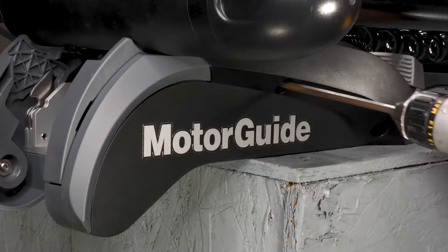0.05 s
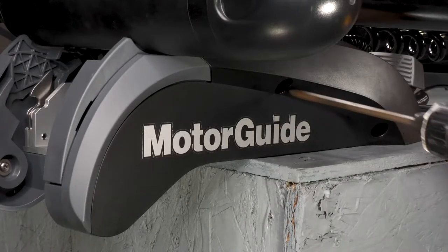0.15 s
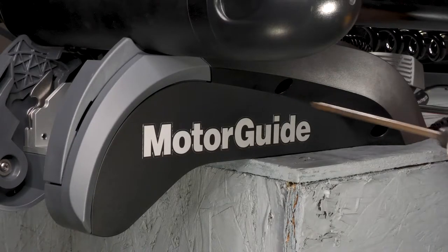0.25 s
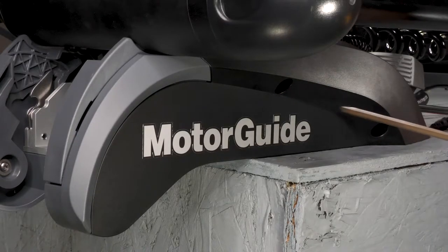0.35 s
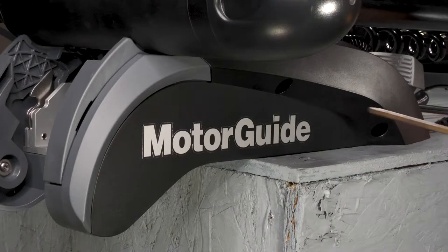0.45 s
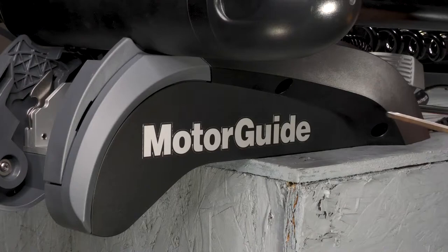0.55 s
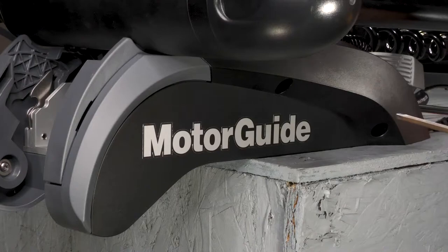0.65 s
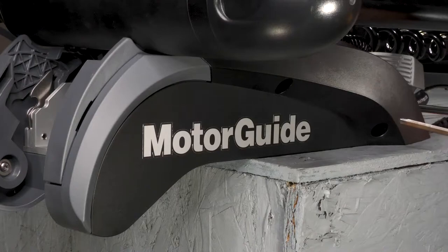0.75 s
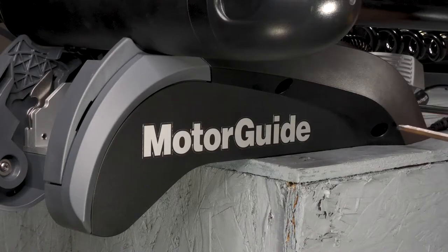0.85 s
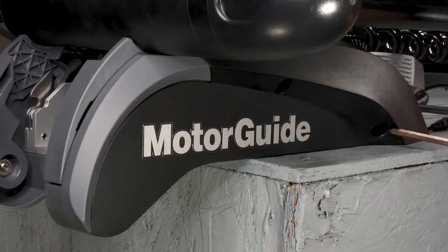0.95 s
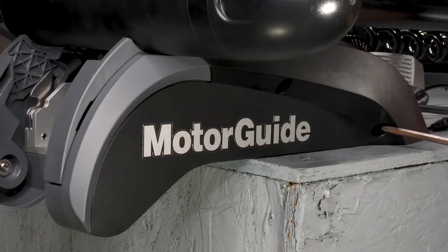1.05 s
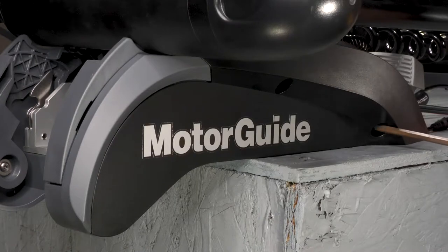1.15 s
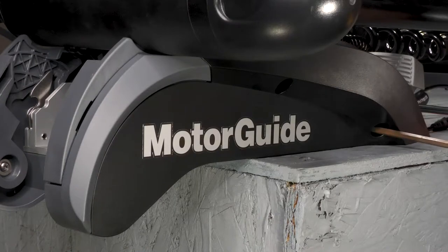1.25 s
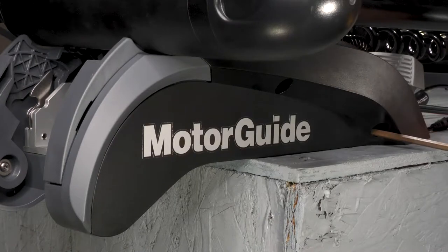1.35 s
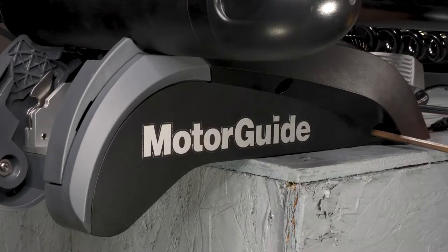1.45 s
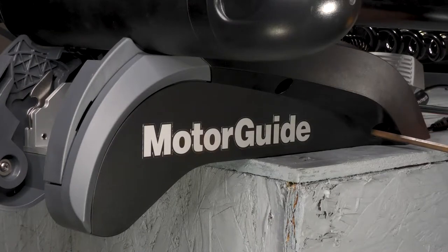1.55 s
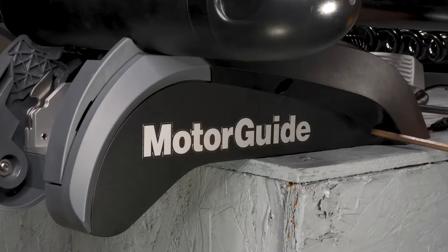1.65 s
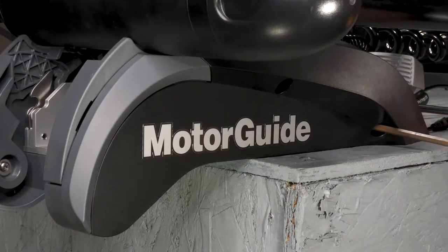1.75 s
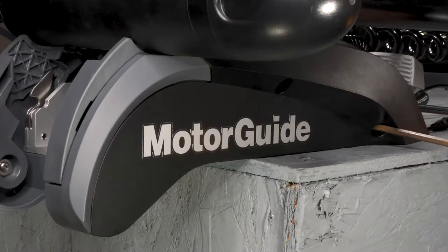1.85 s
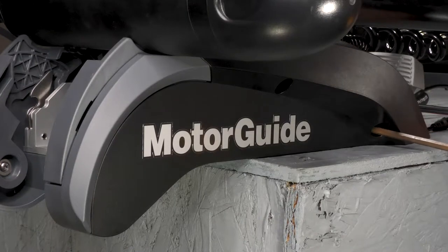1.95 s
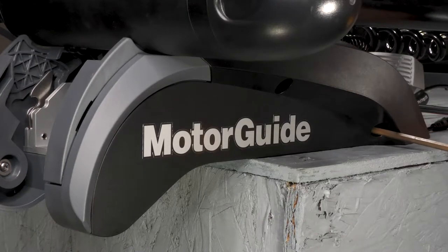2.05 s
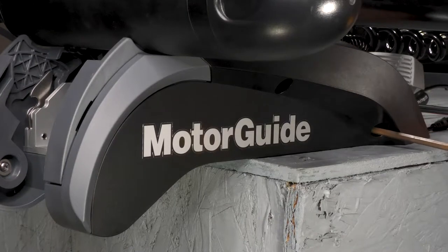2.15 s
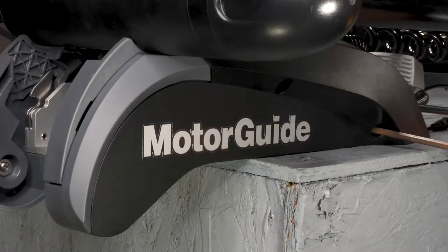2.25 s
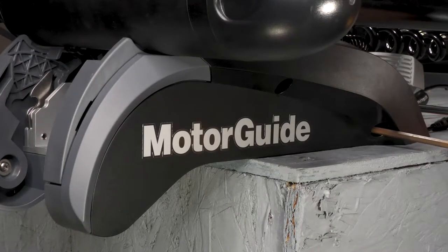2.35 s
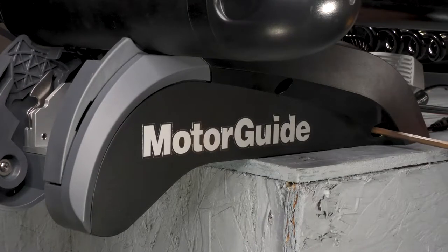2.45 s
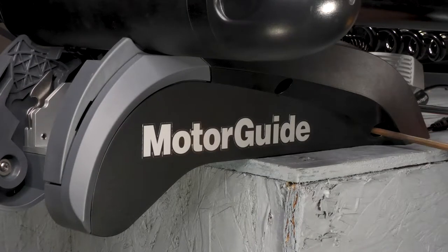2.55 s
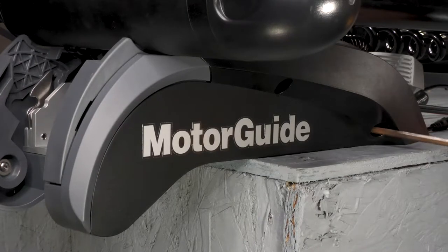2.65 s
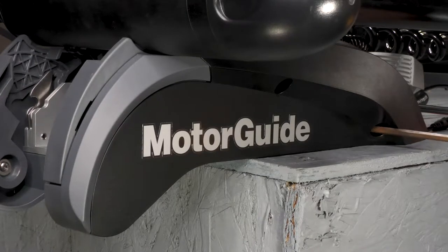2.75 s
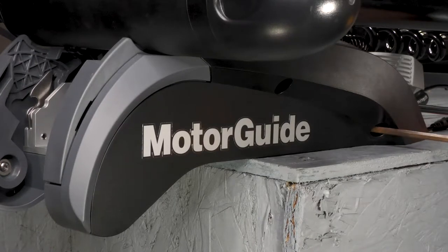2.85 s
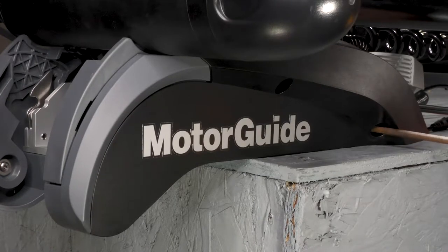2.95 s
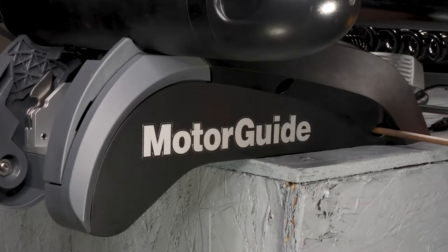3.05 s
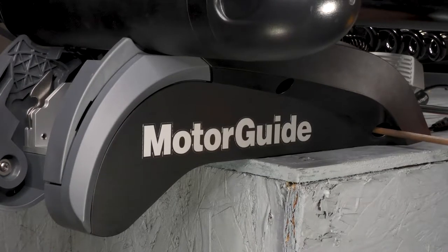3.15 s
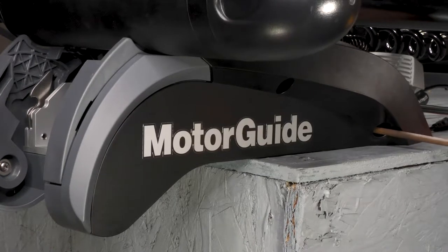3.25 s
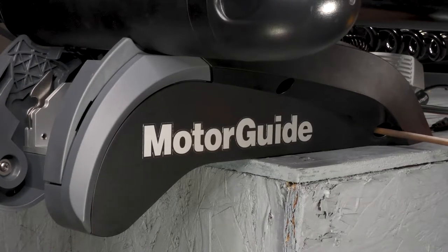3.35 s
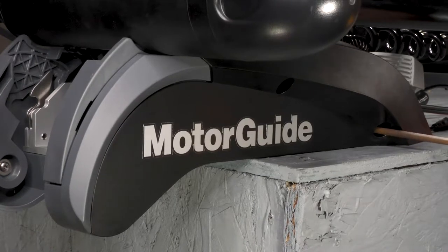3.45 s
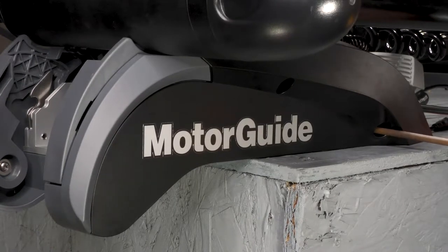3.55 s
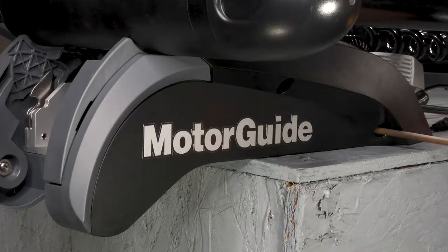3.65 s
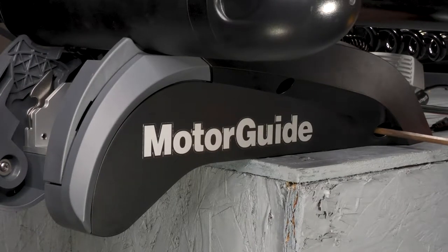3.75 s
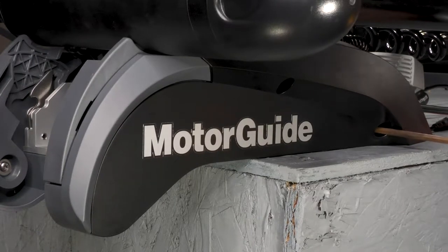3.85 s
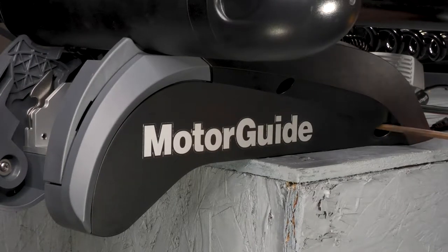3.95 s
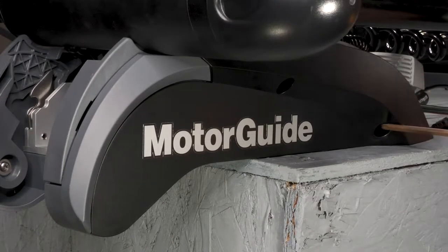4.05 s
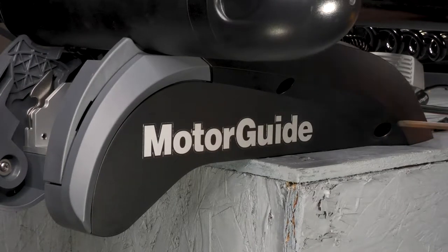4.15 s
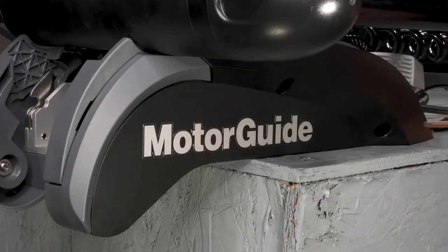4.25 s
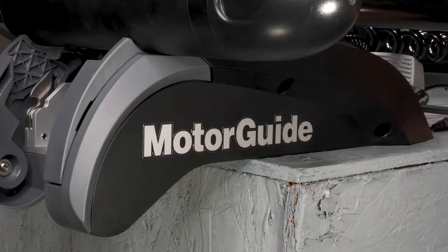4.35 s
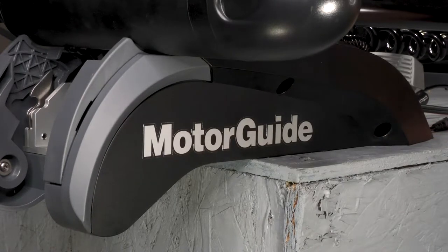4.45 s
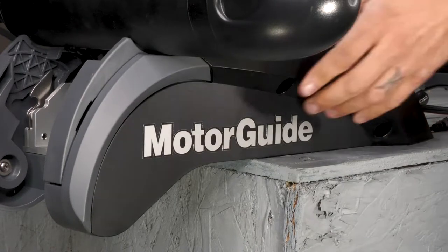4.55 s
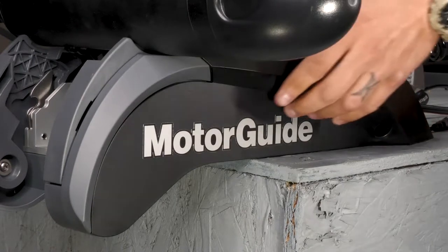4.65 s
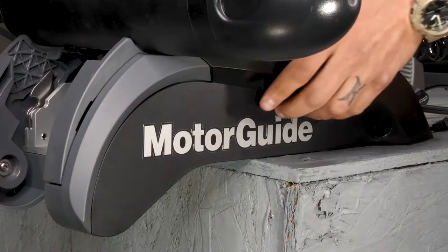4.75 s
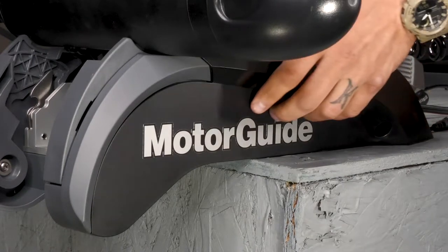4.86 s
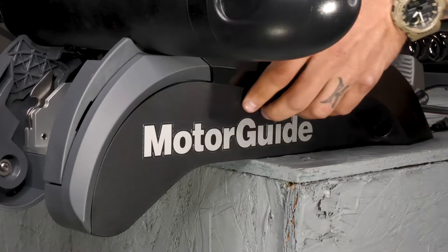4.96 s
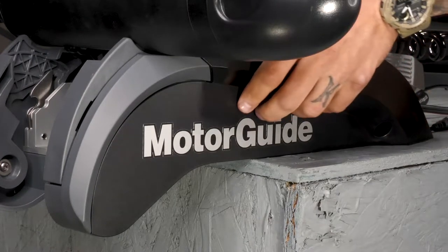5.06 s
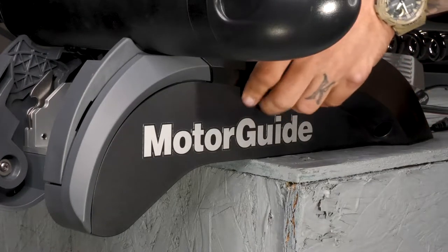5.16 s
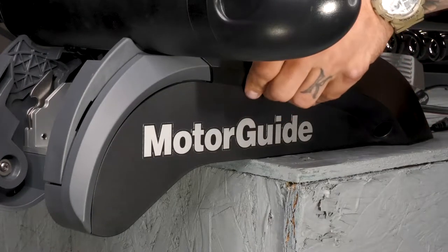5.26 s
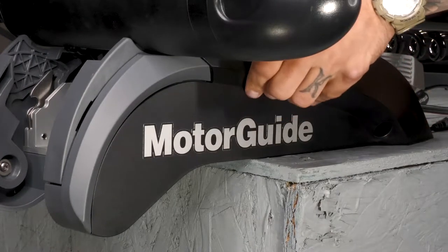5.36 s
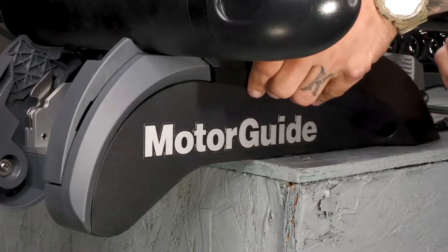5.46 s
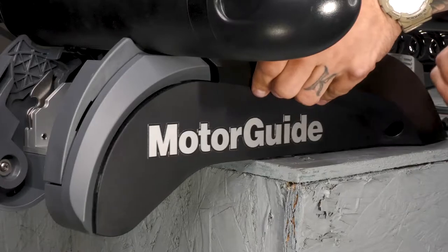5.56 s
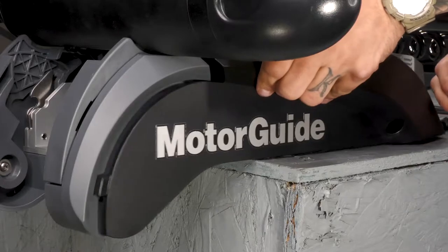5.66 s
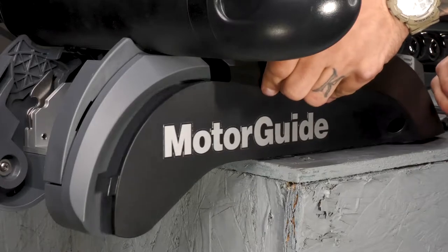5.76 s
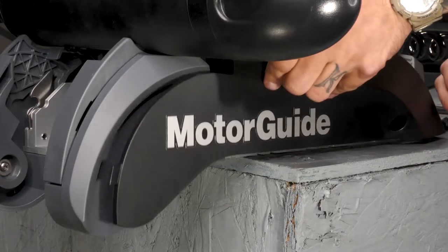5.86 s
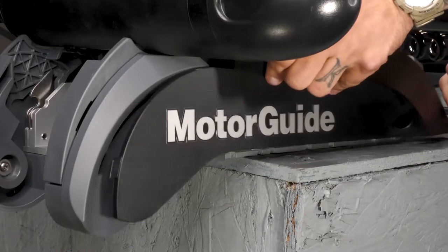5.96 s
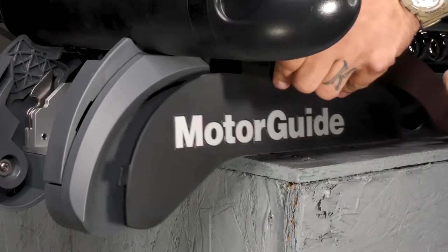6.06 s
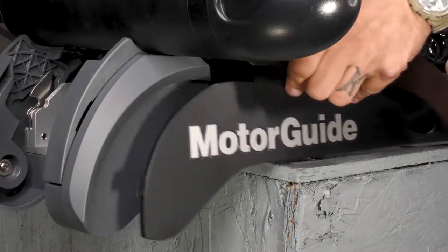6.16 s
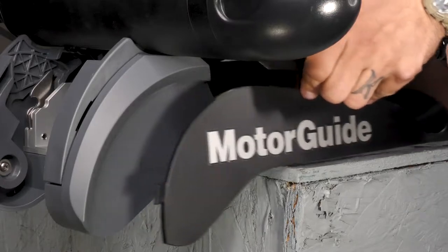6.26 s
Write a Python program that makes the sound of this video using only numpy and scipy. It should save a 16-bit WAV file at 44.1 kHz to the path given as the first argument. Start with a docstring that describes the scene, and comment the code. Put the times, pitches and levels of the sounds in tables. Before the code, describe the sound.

Close mono perspective in a small workshop, with short reflections, soft low rumble, faint mains hum and a distant motor. At 0 seconds there is a brief scuff and dull plastic bump, then near quiet. From 1.3 to 2.2 seconds steel taps and tiny skids search for the screw head, brightest near 1.37. A firm knock at 2.27 and a stronger one at 2.62 drop the bit home, the bracket ringing low. A thin high electric whine starts at 2.5. The drill spins up from 2.87, gears hissing and singing, screw scraping, bracket shuddering, with knocks at 2.94 and 3.43. It dies quickly after 3.77; a screw clinks at 3.92, followed by a faint tap at 4.1. Around 4.6 the far motor gives way to a higher, slowly sagging drone. Light rubs follow, then plastic snaps at 5.44 and 5.6-5.75, with weaker ones near 5.97 and 6.26.

```python
"""A cordless drill with a long bit backs a screw out of a plastic cover on a metal bracket, in a small workshop.
Drill: gear hiss and rotor-locked tones, screw scrape, bracket shudder; a steady winding whine spans the run.
Taps, seating knocks, screw knocks, a clink and cover snaps: gritty noise bursts through part resonances.
Bracket and shank ring as decaying sines; skids are swelling noise; rumble, hum and a far motor lie beneath."""
import sys
import numpy as np
from scipy import signal
from scipy.fft import rfft, irfft, next_fast_len
from scipy.io import wavfile

SR = 44100
rng = np.random.default_rng(int(sys.argv[2]) if len(sys.argv) > 2 else 0)


def generate_wav(signal):
    """Clip the signal to [-1, 1] and save it as 16-bit WAV at the path in sys.argv[1]."""
    frames = np.transpose(np.atleast_2d(signal))
    scaled = np.clip(frames, -1, 1) * 32767
    pcm = np.round(scaled).astype(np.int16)
    wavfile.write(sys.argv[1], SR, pcm)


N = 277830
TIME = np.arange(N) / SR

# Event levels are relative: each source adds its own gain. Spectra of steady noise are relative too.
# rumble and faint hiss: freq_hz, density_db_per_hz
AIR_SPECTRUM = [(15, -6), (35, -5.5), (58, -6), (88, -9.5), (112, -8.5), (160, -10), (200, -14.5),
                (280, -26), (650, -37.5), (950, -38.5), (2400, -48.5), (6000, -56.5), (9200, -49.5),
                (11500, -54.5), (15800, -56)]
# mains hum: freq_hz, level_db
HUM_TONES = [(59.5, -63), (120, -55.5), (183, -69.5)]
# workshop reflections: freq_hz, t60_s, strength_db
ROOM_DECAY = [(150, 0.75, 2), (600, 0.47, 2), (2000, 0.31, -1.5), (5000, 0.25, -0.5), (10000, 0.2, -0.5),
              (16000, .17, -3)]
# bit and fingers skidding over the plastic: middle_s, level_db, half_length_s
SKID_EVENTS = [(0.004, -47, 0.029), (1.689, -60.5, 0.015), (1.775, -56, 0.004), (1.905, -56.5, 0.018),
               (1.953, -58, 0.0093), (1.979, -49.5, 0.013), (4.861, -71.5, 0.07), (5.186, -62, 0.033),
               (5.439, -51, 0.011), (5.618, -52, 0.027), (5.964, -54.5, 0.022), (6.275, -59, 0.017)]
# cover bumped, later snapping free: start_s, level_db, brightness_db_per_octave
SNAP_EVENTS = [(0.0236, -47, -6), (5.439, -42.5, 2), (5.446, -41.5, -7), (5.599, -50, 1.5),
               (5.637, -48.5, 1.5), (5.6663, -48.5, -7.5), (5.7165, -50, 0.5), (5.7476, -49, -4),
               (5.9673, -52.5, 1), (6.2562, -59.5, 2)]
# broad colour of the cover: freq_hz, density_db_per_hz
COVER_COLOUR = [(120, -12), (300, 3), (700, -0.5), (1500, -4.5), (3300, -9), (6000, -6), (11000, -7.5),
                (16000, -22)]
# cover resonances: freq_hz, width_hz, gain_db
COVER_PEAKS = [(226, 40, 3.67), (420, 100, 6.5), (545, 50, 4), (673, 61, 5.7), (1225, 150, 12),
               (1450, 110, 5.5), (1798, 207, 11), (2064, 110, 9.2), (2904, 1050, 9.4), (5100, 390, 3.7)]
# bit feeling for the screw head and leaving it: start_s, level_db, brightness_db_per_octave
TAP_EVENTS = [(1.3386, -39, -4), (1.374, -29.5, 1), (1.4278, -38, -0.5), (1.7907, -36.5, -1.5),
              (1.869, -50.5, 6.5), (1.9757, -36, -3.5), (1.989, -36.5, 3.5), (2.1405, -53, 4.5),
              (2.154, -52.5, -2), (2.498, -46.5, 0), (4.1036, -53, -5.5), (4.5246, -63.5, 10)]
# broad colour of steel contacts: freq_hz, density_db_per_hz
STEEL_COLOUR = [(120, -14.5), (300, 6.5), (700, -1), (1500, -0.5), (3300, -10), (6000, -5.5), (10000, -6),
                (12000, -11.5), (16000, -18)]
# steel resonances: freq_hz, width_hz, gain_db
STEEL_PEAKS = [(664, 66, 8), (930, 53, 3), (1027, 50, 5), (1184, 44, 8.5), (1450, 67, 5.5), (1980, 60, 1.5),
               (2680, 460, 12), (3100, 110, 0), (4060, 300, 2), (5940, 660, -3.5), (8040, 1500, 8),
               (9500, 1000, 4.5)]
# shoves that jolt the whole bracket: start_s, level_db
JOLT_EVENTS = [(1.43, -43), (1.99, -37.5), (2.268, -22.5), (2.622, -13), (2.946, -32.5), (3.1, -35),
               (5.603, -42.5), (5.749, -43.5), (5.975, -41.5)]
# low modes of the bracket: freq_hz, level_db, t60_s
BRACKET_MODES = [(44.67, -13.5, 1), (105, -12, 0.26), (140.05, -2.5, 0.48), (149, -7, 0.18),
                 (164.2, -4, 0.42), (193.7, -7.5, 0.29), (241.9, -11, 0.38), (290, -16, 0.25),
                 (346.3, -22.5, 1), (378.5, -19.5, 0.3), (406, -17, 0.17), (694, -24.5, .35),
                 (1012, -34.5, 0.52), (1190, -35, 0.17)]
# shank knocks as the bit drops into the screw head: start_s, level_db, brightness_db_per_octave
SEATING_EVENTS = [(2.265, -23, 0.2), (2.6146, -20, -1.5), (2.6195, -10, 0.55)]
# broad colour of the shank: freq_hz, density_db_per_hz
SHANK_COLOUR = [(120, -16), (280, 15), (480, -2.5), (700, -3), (1500, -7), (3300, -11), (6000, -10),
                (10000, -8.5), (12000, -13.5), (16000, -10.5)]
# shank resonances: freq_hz, width_hz, gain_db
SHANK_PEAKS = [(650, 41, 5), (1148, 90, 6), (1530, 85, 2), (2660, 520, 7.5), (4030, 240, 9.5),
               (4400, 280, 4), (4920, 397, 7.5), (5964, 360, 1.5), (6945, 180, 9), (7960, 430, 7.5),
               (9000, 640, 8.5), (11900, 2300, 7)]
# the shank's brief ring: freq_hz, level_db, t60_s
SHANK_MODES = [(2638, -9.5, 0.044), (2760, -6.5, 0.063)]
# gear mesh tones, before the shell gain: rotor_multiple, level_db
MESH_TONES = [(30, -9), (31, -11), (32, -17), (33, -10), (36, -23)]
# gearbox shell radiation: freq_hz, gain_db
SHELL_GAIN = [(4400, -33), (5000, -3.5), (5600, -4.5), (7000, -14)]
# gear hiss: freq_hz, density_db_per_hz
GEAR_SPECTRUM = [(710, -44), (1200, -6), (1620, -2), (1790, -2), (2290, -6.5), (2870, -7), (3720, -9.5),
                 (5150, -8.5), (5730, -12), (7920, -8), (8540, -9), (9620, -7.5), (10800, -10.5),
                 (15800, -13.5)]
# screw scrape: freq_hz, density_db_per_hz
SCRAPE_SPECTRUM = [(35, -30.5), (60, 2), (97, -52), (145, 5), (320, -1.5), (470, 3.5), (548, -9),
                   (700, -5.5), (853, -11.5), (994, -7.5), (1570, -16), (1870, -9.5), (3500, -32),
                   (4550, -27), (7700, -120)]
# bracket response to steady shaking: freq_hz, density_db_per_hz
SHUDDER_SPECTRUM = [(25, -31), (45, 0), (65, -26), (110, -6), (134, -28.5), (144, 5.5), (154, 0),
                    (190, -19), (300, -48.5), (1000, -100)]
# turning screw knocking in its hole: start_s, level_db, brightness_db_per_octave
KNOCK_EVENTS = [(2.944, -18.5, 4), (3.097, -32, -5), (3.318, -35, 2.5), (3.425, -18, 2), (3.444, -33, 3),
                (3.538, -25, -3), (3.649, -25, 0.5), (3.675, -31.5, -4.5), (3.736, -52, 3),
                (3.764, -37, 6.5)]
# loose screw clinking as the bit leaves: start_s, level_db, brightness_db_per_octave
CLINK_EVENTS = [(3.915, -34, 1), (3.9235, -25.5, 2.3)]
# broad colour of the screw: freq_hz, density_db_per_hz
SCREW_COLOUR = [(120, -15), (400, 12), (900, -9.5), (1500, -10.5), (3300, -22.5), (5500, -18),
                (9500, -11.5), (16000, -36)]
# screw resonances: freq_hz, width_hz, gain_db
SCREW_PEAKS = [(349, 37, 4.8), (1807, 35, 14), (1897, 160, 9.9), (2110, 380, 9), (2610, 1050, 12.5),
               (3320, 290, 12.3), (3900, 160, 4.6), (4020, 700, 9.2)]

# trigger touched, rotor starts, trigger let go
TOUCH_S, START_S, RELEASE_S = 2.487, 2.865, 3.772
# rotor speed limit in turns per second; run-up and coasting time constants
TOP_SPEED_HZ, SPIN_UP_S, COAST_S = 167.5, 0.172, 0.15
SWITCHING_HZ = 7762
GEAR_ATTACK_S = 0.093
# gearbox reference level under drive, fall once released
GEAR_DB, GEAR_FALL_DB_PER_S = -50.5, 265
# scrape at the start, growth as the screw loosens, extra fall after release
SCRAPE_DB, LOOSENING_DB_PER_S, SCRAPE_FALL_DB_PER_S = -47, 6, 143
SHAKE_DB, RESONANT_SHAKE_DB = -46.5, -29
RESONANCE_HZ, RESONANCE_WIDTH_HZ = 137.6, 17.4
AIR_DB = -50.5
# a far motor gives way to a higher, slowly sagging drone
CHANGEOVER_S, FAR_MOTOR_HZ, FAR_MOTOR_DB = 4.62, 72.5, -53.5
DRONE_HZ, DRONE_SAG_HZ_PER_S, DRONE_DB = 137.6, 2.89, -52
# table level above which a rub is duller; tilt per dB above it
LIGHT_RUB_DB, RUB_DULLING_DB_PER_OCTAVE_PER_DB = -65.5, 0.41
CUTOFF_HZ = 15850


def from_db(db):
    """Decibels to gain."""
    return 10 ** (np.asarray(db) / 20)


def rms_one(x):
    """Scale to unit power."""
    return x / np.sqrt(np.mean(x ** 2) + 1e-20)


def ramp(start_s, length_s):
    """Rise from zero to one, then hold."""
    return np.clip((TIME - start_s) / length_s, 0, 1)


def since(moment_s):
    """Seconds passed since a moment, zero before it."""
    return np.maximum(TIME - moment_s, 0)


def drift(knots_per_s):
    """Interpolated random knots of unit spread."""
    knots = rng.standard_normal(2000)
    return np.interp(TIME * knots_per_s, np.arange(len(knots)), knots)


def add(track, start_s, sound):
    """Mix a sound in at a time."""
    start = max(round(start_s * SR), 0)
    track[start:start + len(sound)] += sound[:N - start]


def bins(size):
    """Frequencies of a real transform."""
    return np.arange(size // 2 + 1) * SR / size


def at_hz(points, hz):
    """Read a spectrum on a log-frequency axis."""
    f, value = np.transpose(points)
    return np.interp(np.log(np.maximum(hz, 1)), np.log(f), value)


def coloured(x, spectrum):
    """Give a steady sound a spectrum; unit power."""
    size = next_fast_len(N)
    gain = from_db(at_hz(spectrum, bins(size)))
    return rms_one(irfft(rfft(x, size) * gain, size)[:N])


def causal(x, gain_db):
    """Minimum-phase filter, so that nothing sounds before the blow."""
    cepstrum = irfft(gain_db * np.log(10) / 20)
    size = len(cepstrum)
    cepstrum[1:size // 2] *= 2
    cepstrum[size // 2 + 1:] = 0
    return irfft(rfft(x, size) * np.exp(rfft(cepstrum)))


def part_response(colour, peaks, hz):
    """Gain of a part in dB: its broad colour plus its resonances."""
    resonances = sum(db / (1 + (2 * (hz - f) / width) ** 2) for f, width, db in peaks)
    return at_hz(colour, hz) + resonances


def spot_ripple(hz, spread_db=3.0, spacing_hz=55):
    """Each struck spot favours a different set of the part's many close modes."""
    knots = rng.standard_normal(1000)
    return spread_db * np.interp(hz / spacing_hz, np.arange(len(knots)), knots)


def grit(size, spread_db):
    """Many tiny contacts of uneven but bounded strength; unit power."""
    strength_db = spread_db * rng.uniform(-np.sqrt(3), np.sqrt(3), size // 16)
    return rms_one(rng.standard_normal(size) * from_db(strength_db.repeat(16)))


def room_tail(size):
    """Diffuse reflections: band-weighted noise, the treble dying first."""
    hz, t = bins(size), TIME[:size]
    noise = rfft(rng.standard_normal(size))
    centres_hz = np.transpose(ROOM_DECAY)[0]
    tail = np.zeros(size)
    for row, (_, t60_s, db) in zip(np.eye(len(centres_hz)), ROOM_DECAY):
        share = at_hz(np.c_[centres_hz, row], hz)
        tail += irfft(noise * share) * from_db(db - 60 * t / t60_s)
    return tail


def in_room(x, room_db, wall_s=0.0033):
    """Direct sound plus the answer of bench and walls, which differs from spot to spot."""
    tail = room_tail(len(x)) * (1 - np.exp(-TIME[:len(x)] / wall_s))
    echo = signal.fftconvolve(x, tail / np.linalg.norm(tail))[:len(x)]
    return x + from_db(room_db) * echo


def contacts(rows, colour, peaks, level_db, body_db, edge_db, length_s, rise_s, grit_db, room_db, size=24576):
    """Each contact is a short gritty burst into the part's resonances, with its own brightness."""
    out, hz, t = np.zeros(N), bins(size), TIME[:size]
    shelves_db = at_hz([(800, body_db), (1800, 0), (3800, 0), (7500, edge_db)], hz)
    part_db = part_response(colour, peaks, hz) + shelves_db
    octaves = np.log2(np.clip(hz, 800, 7500) / 2600)
    dying = np.exp(-t / length_s)
    force = dying * (1 - np.exp(-t / rise_s))
    for start_s, db, brightness in rows:
        burst = grit(size, grit_db) * force
        # the room builds up while the contact lasts
        echo = room_tail(size) * (1 - dying)
        mix = burst / np.linalg.norm(burst) + from_db(room_db) * echo / np.linalg.norm(echo)
        gain_db = part_db + brightness * octaves + spot_ripple(hz)
        add(out, start_s, from_db(db + level_db) * causal(np.linalg.norm(force) * mix, gain_db))
    return out


def struck(blows, modes, spread_db, build_s):
    """Each blow rings every mode with a strength of its own; the ringing takes a moment to build up."""
    out, t = np.zeros(N), TIME[:SR]
    hz, mode_db, t60_s = np.transpose(modes)[:, :, None]
    envelope = from_db(mode_db - 60 * t / t60_s) * (1 - np.exp(-t / build_s))
    rings = np.sin(2 * np.pi * hz * t) * envelope
    signs = (-1) ** np.arange(len(modes))
    for start_s, db in blows:
        strength_db = db + spread_db * rng.standard_normal(len(modes))
        add(out, start_s, (signs * from_db(strength_db)) @ rings)
    return out


def pushes(rows, push_db):
    """A contact also pushes the part behind it, in step with its strength: start_s, level_db."""
    return [(start_s, db + push_db) for start_s, db, _ in rows]


def wavering(hz, db, waver_db, wander_hz):
    """A tone whose level and pitch wander a little."""
    level = np.sqrt(2) * from_db(db + waver_db * drift(9))
    turns = np.cumsum(hz + wander_hz * drift(12)) / SR
    return level * np.sin(2 * np.pi * turns)


def workshop():
    """Rumble and faint hiss as shaped noise; mains hum, far motor and drone as wavering tones."""
    air = from_db(AIR_DB) * coloured(rng.standard_normal(N), AIR_SPECTRUM)
    hum = sum(wavering(hz, db, waver_db=1, wander_hz=0.3) for hz, db in HUM_TONES)
    changed = ramp(CHANGEOVER_S, length_s=0.079)
    motor = wavering(FAR_MOTOR_HZ, FAR_MOTOR_DB, waver_db=3.5, wander_hz=3.2)
    drone_hz = DRONE_HZ - DRONE_SAG_HZ_PER_S * since(CHANGEOVER_S)
    drone = wavering(drone_hz, DRONE_DB, waver_db=2.5, wander_hz=2.38)
    return air + hum + (1 - changed) * motor + changed * drone


def skids(level_db=2, room_db=-4.0, grit_db=9.5, size=32768):
    """Friction swells and fades in the cover's resonances, duller when pressed harder."""
    out, hz = np.zeros(N), bins(size)
    part_db = part_response(COVER_COLOUR, COVER_PEAKS, hz)
    octaves = np.log2(np.maximum(hz, 300) / 1500)
    for middle_s, db, half_s in SKID_EVENTS:
        start_s = max(middle_s - 3 * half_s, 0)
        swell = np.exp(-((TIME[:size] + start_s - middle_s) / half_s) ** 2)
        rub = in_room(grit(size, grit_db) * swell, room_db)
        tilt_db = RUB_DULLING_DB_PER_OCTAVE_PER_DB * min(LIGHT_RUB_DB - db, 0)
        gain_db = part_db + tilt_db * octaves + spot_ripple(hz)
        add(out, start_s, from_db(db + level_db) * causal(rub, gain_db))
    return out


def cover_snaps():
    """Short dull-to-bright bursts excite the plastic cover's broad resonances."""
    return contacts(SNAP_EVENTS, COVER_COLOUR, COVER_PEAKS, level_db=12, body_db=-15, edge_db=-15.5,
                    length_s=0.0029, rise_s=0.0011, grit_db=7, room_db=-1.0)


def bit_taps():
    """Light steel contacts of the bit about the screw head."""
    return contacts(TAP_EVENTS, STEEL_COLOUR, STEEL_PEAKS, level_db=9.5, body_db=-5.0, edge_db=-11,
                    length_s=0.0038, rise_s=0.0019, grit_db=4.0, room_db=-3.0)


def bracket_thumps():
    """Jolts, taps, knocks and clinks push the bracket, which rings in its low modes."""
    blows = list(JOLT_EVENTS) + pushes(TAP_EVENTS, push_db=-16)
    blows += pushes(KNOCK_EVENTS, push_db=-14.5) + pushes(CLINK_EVENTS, push_db=-15.5)
    return struck(blows, BRACKET_MODES, spread_db=3.0, build_s=0.0067)


def seating_knocks():
    """The bit drops home: bursts in the shank's resonances, plus its brief two-mode ring."""
    knock = contacts(SEATING_EVENTS, SHANK_COLOUR, SHANK_PEAKS, level_db=10.5, body_db=-5, edge_db=-5,
                     length_s=0.0033, rise_s=0.0024, grit_db=2.5, room_db=-2.0)
    ring = struck(pushes(SEATING_EVENTS, push_db=-3), SHANK_MODES, spread_db=2.0, build_s=0.0012)
    return knock + ring


def whine(level_db=-60.0, octave_db=-21, flutter_db=1, attack_s=0.026, fade_s=0.12):
    """The chopped current makes the windings sing as soon as the trigger is touched."""
    held = ramp(TOUCH_S, attack_s) * (1 - ramp(RELEASE_S - fade_s, fade_s))
    phase = 2 * np.pi * SWITCHING_HZ * TIME
    tone = np.sin(phase) + from_db(octave_db) * np.sin(2 * phase)
    return held * np.sqrt(2) * from_db(level_db + flutter_db * drift(24)) * tone


def rotor_speed():
    """Turns per second: exponential run-up from the start, exponential coast after release."""
    run_up = 1 - np.exp(-since(START_S) / SPIN_UP_S)
    return TOP_SPEED_HZ * run_up * np.exp(-since(RELEASE_S) / COAST_S)


def per_turn(turns, size=512):
    """Tooth and brush marks that come round again with every turn of the rotor."""
    phases = np.exp(2j * np.pi * rng.random(size // 5))
    marks = irfft(np.r_[0, phases], size * 8)
    return rms_one(np.interp(turns % 1 * len(marks), np.arange(len(marks)), marks))


def rotor_tone(multiple, turns, unsteady_db=3):
    """A slightly unsteady tone locked to the rotor."""
    level = np.sqrt(2) * from_db(unsteady_db * drift(24.55))
    return level * np.sin(2 * np.pi * multiple * turns)


def gearbox(speed, turns, hiss_db=3.0, third_db=0, repeat_db=-8, throb=0.047):
    """Gears hiss and sing at multiples of the rotor speed, loudest near the shell's resonances."""
    # uneven tooth load: once a rotor turn, once a turn of the planet carrier
    pulsing = 1 + throb * (np.sin(2 * np.pi * turns) + np.sin(np.pi * turns / 2))
    rough = rng.standard_normal(N) * pulsing + from_db(repeat_db) * per_turn(turns)
    hiss = from_db(hiss_db) * coloured(rough, GEAR_SPECTRUM)
    mesh = from_db(third_db) * rotor_tone(3, turns)
    for multiple, db in MESH_TONES:
        mesh += from_db(db + at_hz(SHELL_GAIN, multiple * speed)) * rotor_tone(multiple, turns)
    level_db = GEAR_DB - GEAR_FALL_DB_PER_S * since(RELEASE_S)
    return from_db(level_db) * (hiss + mesh)


def screw_scrape(catch_db=3):
    """The thread catches and slips: unsteady noise that grows as the screw works loose."""
    slips = rng.standard_normal(N) * from_db(catch_db * drift(160))
    level_db = SCRAPE_DB + LOOSENING_DB_PER_S * since(START_S) - SCRAPE_FALL_DB_PER_S * since(RELEASE_S)
    return from_db(level_db) * coloured(slips, SCRAPE_SPECTRUM)


def bracket_shudder(speed):
    """The rotor shakes the bracket, most as the driven speed sweeps through its resonance."""
    detuning = 2 * (speed - RESONANCE_HZ) / RESONANCE_WIDTH_HZ
    in_tune = (TIME < RELEASE_S) / (1 + detuning ** 2)
    shaking = from_db(SHAKE_DB) * speed / TOP_SPEED_HZ + from_db(RESONANT_SHAKE_DB) * in_tune
    return shaking * coloured(rng.standard_normal(N), SHUDDER_SPECTRUM)


def drill(wobble=0.00271):
    """Gearbox, scraping screw and shaken bracket follow one rotor."""
    speed = rotor_speed()
    turns = np.cumsum(speed * (1 + wobble * drift(40))) / SR
    running = gearbox(speed, turns) + screw_scrape() + bracket_shudder(speed)
    return ramp(START_S, GEAR_ATTACK_S) * running


def screw_knocks():
    """The turning screw knocks in its hole: gritty bursts in the steel resonances."""
    return contacts(KNOCK_EVENTS, STEEL_COLOUR, STEEL_PEAKS, level_db=9.5, body_db=0.5, edge_db=-20.5,
                    length_s=0.004, rise_s=0.0023, grit_db=1.5, room_db=-3.5)


def screw_clinks():
    """The loose screw clinks: longer bursts with a fast rise in the screw's resonances."""
    return contacts(CLINK_EVENTS, SCREW_COLOUR, SCREW_PEAKS, level_db=4.5, body_db=-7, edge_db=-16,
                    length_s=0.0098, rise_s=0.00076, grit_db=6, room_db=-3.5)


def scene():
    """Sum of all sources, one channel."""
    cover = skids() + cover_snaps()
    bit = bit_taps() + seating_knocks()
    screw = screw_knocks() + screw_clinks()
    return (workshop() + cover + bit + bracket_thumps() + whine() + drill() + screw)[None]


def record(dry):
    """Steep elliptic low-pass at CUTOFF_HZ."""
    lowpass = signal.ellip(12, 0.1, 80, CUTOFF_HZ, fs=SR, output="sos")
    return signal.sosfilt(lowpass, dry)


dry = scene()
out = record(dry)
generate_wav(out)
```